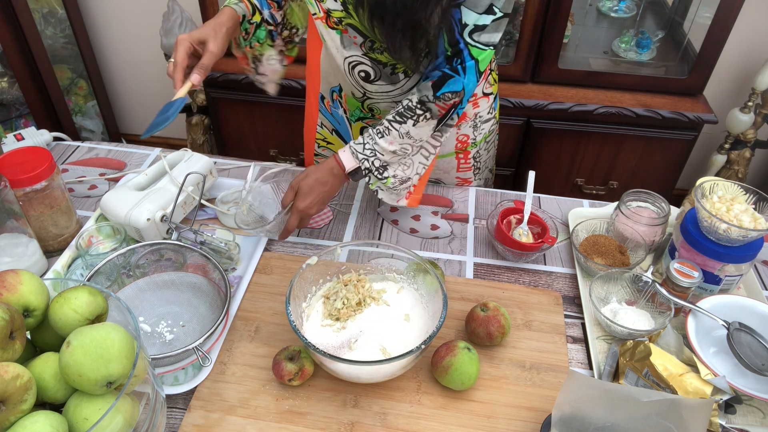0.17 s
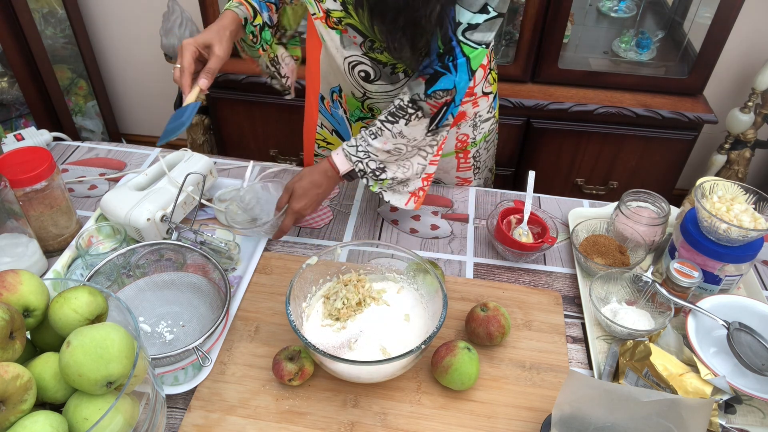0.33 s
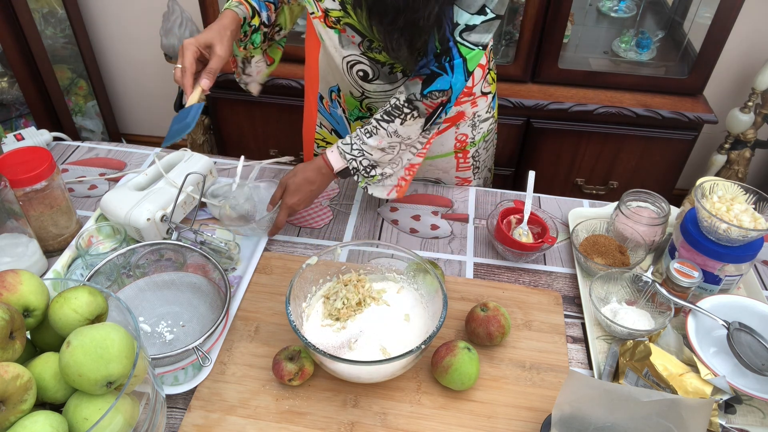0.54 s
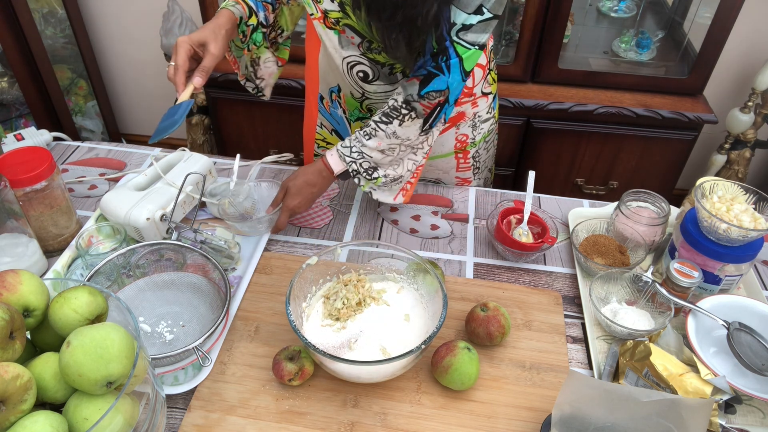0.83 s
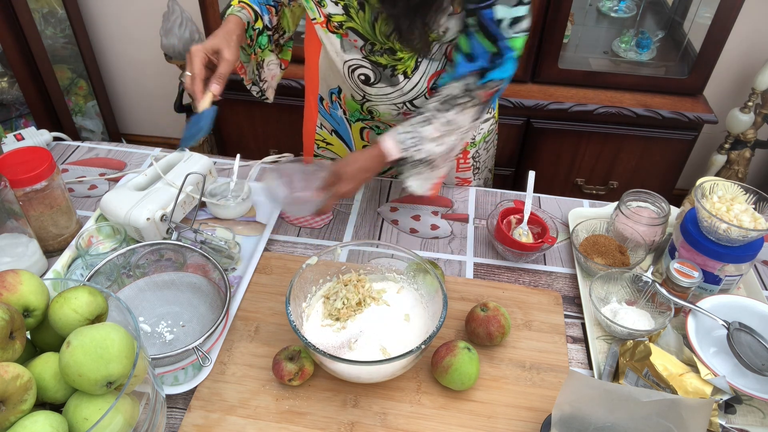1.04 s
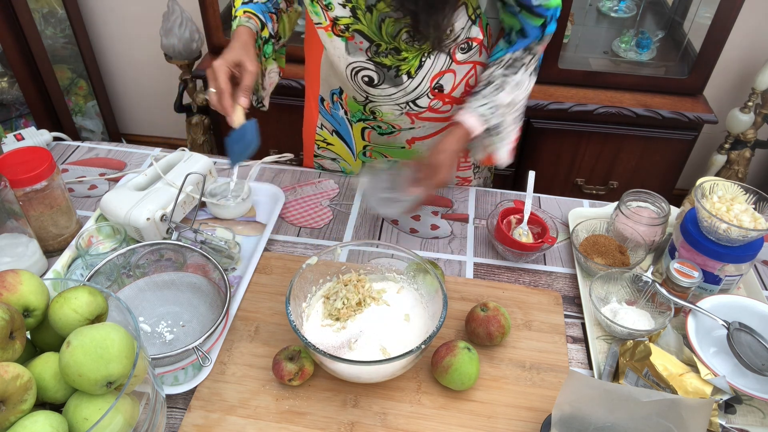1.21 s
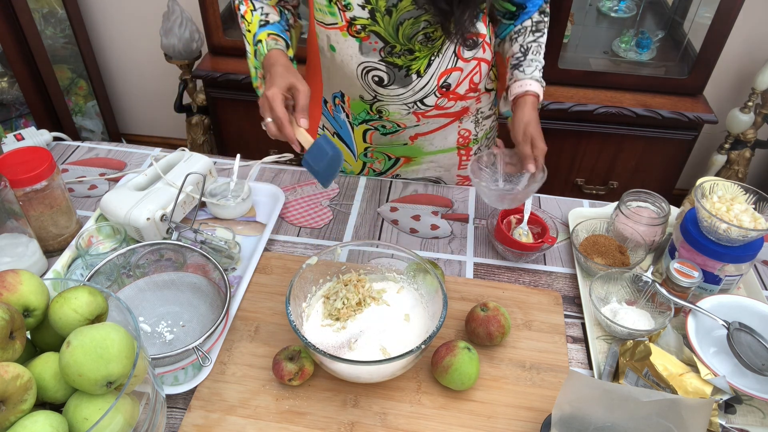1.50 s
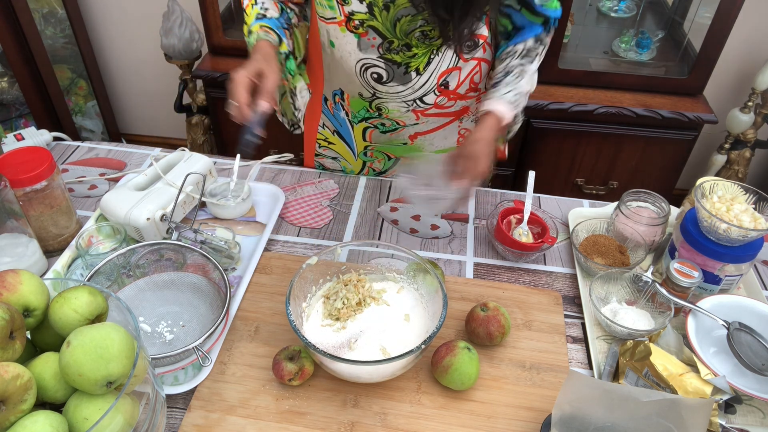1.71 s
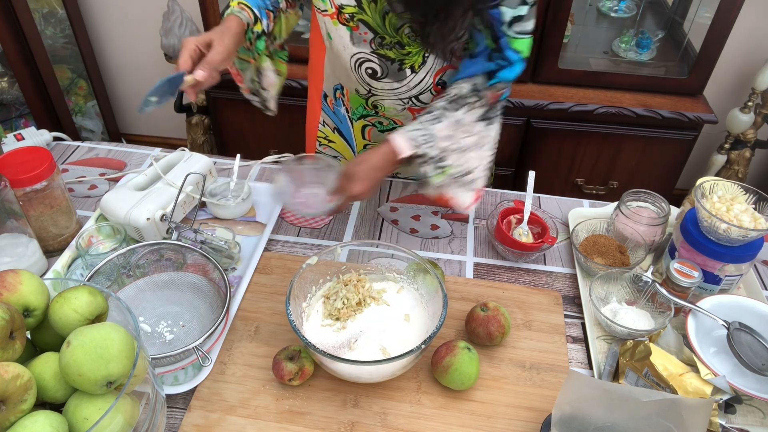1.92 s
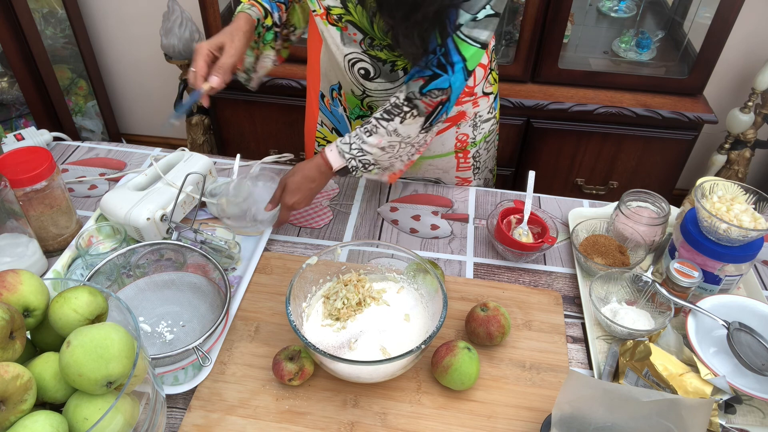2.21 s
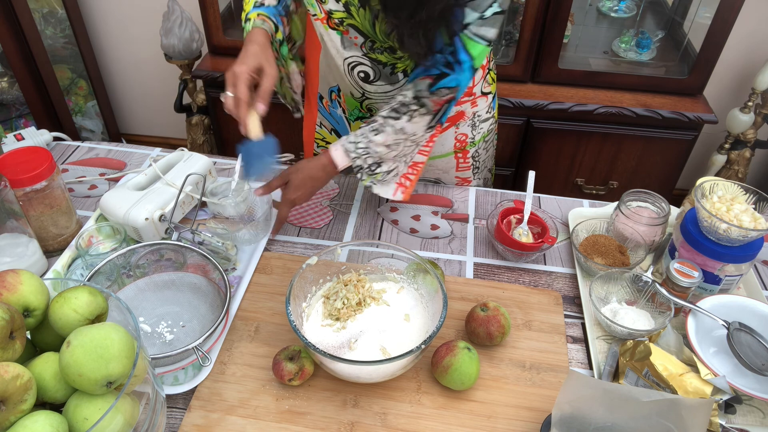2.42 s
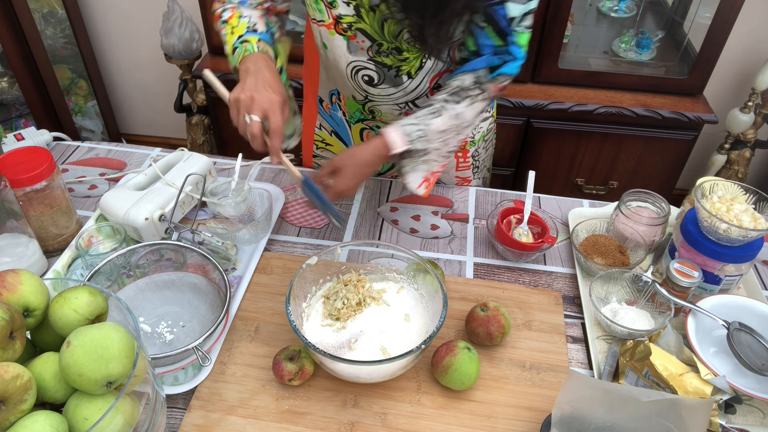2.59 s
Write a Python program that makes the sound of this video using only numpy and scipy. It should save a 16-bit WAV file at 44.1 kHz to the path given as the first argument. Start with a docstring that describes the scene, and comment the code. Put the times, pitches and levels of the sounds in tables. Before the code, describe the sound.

Glass bowl clatters onto a loaded tray, rocks and settles, then knocks down again with brighter clinks

```python
"""A small glass bowl is set down twice on a crowded plastic tray in a home kitchen: it knocks, rocks and rings.
The bowl, a jar and a cup beside it are sums of decaying sine modes, started anew by each blow.
The knocks are noise bursts through the tray's resonances plus a low thud; the chatter is dense random ticks.
All these get a noise-made room tail; underneath lies a soft low air noise with two wavering hums."""
import sys
import numpy as np
from scipy import signal
from scipy.fft import rfft, irfft, next_fast_len
from scipy.io import wavfile
from scipy.ndimage import uniform_filter1d

SR = 44100
rng = np.random.default_rng(int(sys.argv[2]) if len(sys.argv) > 2 else 0)


def to_wav(s):
    """Save 16-bit WAV."""
    ch = np.atleast_2d(s).T  # columns
    pcm = np.round(np.clip(ch, -1, 1) * 32767)  # PCM
    wavfile.write(sys.argv[1], SR, pcm.astype(np.int16))


def level_to_linear(level):
    """Convert decibel levels to linear amplitude factors, elementwise."""
    exponent = np.asarray(level, float) / 20
    return 10 ** exponent


N = 121275  # length in samples

# Colour of a contact on the tray, before tilt and resonances. Each row: frequency in Hz, gain in dB.
CLACK_COLOUR = [(35, -51), (70, -10), (130, -1.5), (586, -0.5), (1160, 1.5), (2460, -1), (3600, -8.5),
                (6300, -11), (8000, -19.5), (11000, -24.5), (14700, -27.5), (16500, -44.5)]

KITCHEN_DB, RING_KITCHEN_DB = -6, -9  # room tail against the dry sound: for tray sounds, for ringing things


def unit(x):
    """Scales x to rms 1."""
    return x / np.sqrt(np.mean(x ** 2) + 1e-20)


def along(points, hz):
    """Reads (Hz, value) points on a logarithmic frequency axis."""
    f, v = np.transpose(points)
    return np.interp(np.log(hz + 1), np.log(f + 1), v)


def filtered(x, response):
    """Multiplies the spectrum of x by a complex response of frequency."""
    m = next_fast_len(len(x) + 8192)  # spare room for the filter to ring out
    spectrum = rfft(x, m) * response(np.fft.rfftfreq(m, 1 / SR))
    return irfft(spectrum, m)[:len(x)]


def causal(db):
    """Minimum-phase response with the given gains in dB, so that nothing sounds ahead of its contact."""
    cepstrum = irfft(db * np.log(10) / 20)
    half = len(cepstrum) // 2
    folded = np.r_[cepstrum[0], 2 * cepstrum[1:half], cepstrum[half], np.zeros(len(cepstrum) - half - 1)]
    return np.exp(rfft(folded))


def octaves(hz):
    """Distance in octaves from 2 kHz, the pivot of the tilts."""
    return np.log2(np.clip(hz, 50, None) / 2000)


def tray(f):
    """The loaded tray: damped resonances added to a plain path of gain 1."""
    # Each row: centre in Hz, width in Hz, level in dB before the common trim below.
    resonances = [(124, 10, -0.5), (207, 19.8, 7.5), (305, 120, 6.5), (417, 21, -4.5), (799, 50, 2),
                  (900, 104, 6.5), (1023, 35, -1.5), (1194, 52, -7.5), (1690, 80, -3), (2270, 80, -11.5),
                  (2650, 100, -2), (3010, 62, 7), (3446, 100, 8.5), (3800, 200, -3)]
    trim_db = -3.5
    body = sum(level_to_linear(db) * 1j * f * width / (centre ** 2 - f ** 2 + 1j * f * width)
               for centre, width, db in resonances)
    return 1 + level_to_linear(trim_db) * body


def ring(modes, t, share, rise_s, best_hz=1000, reach=99):
    """One blow on (Hz, dB, t60 s) modes: those near best_hz speak most, and share scales every t60."""
    scatter_db = 2  # random level spread from blow to blow
    hz, db, t60 = np.transpose(modes)[:, :, None]
    level_luck, phase_luck = rng.standard_normal((2, len(modes), 1))
    drive_db = -6 * (np.log2(hz / best_hz) / reach) ** 2
    decay = level_to_linear(db + drive_db + scatter_db * level_luck - 60 * t / (t60 * share))
    tones = decay * np.sin(2 * np.pi * hz * t + phase_luck)
    return np.sum(tones, axis=0) * (1 - np.exp(-t / rise_s))


def kitchen(x):
    """Convolves x with a fresh noise tail of unit energy in which each frequency dies at its own speed."""
    # Each row: frequency in Hz, decay by 60 dB in seconds.
    tail_t60 = [(100, 0.29), (500, 0.48), (2000, .5), (6000, 0.46), (14000, 0.35)]
    hz, t, z = signal.stft(rng.standard_normal(SR * 3 // 4), SR, nperseg=256)
    fade = level_to_linear(-60 * t / along(tail_t60, hz)[:, None])
    tail = signal.istft(z * fade, SR, nperseg=256)[1]
    delayed = np.pad(x, (150, 0))  # the tail comes 3.4 ms behind the dry sound
    return signal.fftconvolve(delayed, tail / np.linalg.norm(tail))


def add(out, s, x):
    """Mixes x into out from time s in seconds."""
    part = out[round(s * SR):][:len(x)]
    part += x[:len(part)]


def place(out, s, dry, wet_db):
    """Mixes in a sound and its room tail."""
    add(out, s, dry)
    add(out, s, level_to_linear(wet_db) * kitchen(dry))


def air():
    """Low room noise in soft patches of time and pitch; two narrow noise bands waver as hums."""
    # Spectrum shape of the air. Each row: frequency in Hz, relative density in dB per Hz.
    air_colour = [(15, -66), (25, -30.5), (63, -12.5), (87, -12), (163, -9), (192, -0.5), (288, -4),
                  (368, 0), (399, -19.5), (457, -5), (1030, -4.5), (2090, -24), (14400, -42.5),
                  (16500, -53)]
    # Each row: hum frequency in Hz, width in Hz, level in dB rms.
    hum_bands = [(98.3, 12, -75), (379, 21, -74.5)]
    air_db, patchy_db = -63, 0.7  # air level rms, rms depth of its patches
    z = signal.stft(rng.standard_normal(N + 512), nperseg=512)[2]
    field = uniform_filter1d(rng.standard_normal(z.shape), size=4, axis=0)  # smooth over frequency
    field = uniform_filter1d(field, size=12, axis=1)  # smooth over time
    patchy = signal.istft(z * level_to_linear(patchy_db * unit(field)), nperseg=512)[1][:N]
    out = level_to_linear(air_db) * unit(filtered(patchy, lambda f: level_to_linear(along(air_colour, f))))
    for hz, width, db in hum_bands:
        band = filtered(rng.standard_normal(N), lambda f: np.exp(-((f - hz) / width) ** 2))
        out += level_to_linear(db) * unit(band)
    return out


def jar():
    """The neighbouring jar is touched and its modes ring."""
    # Contacts. Each row: start in seconds, level in dB, to which the mode levels are added.
    clinks = [(.160, -51), (.184, -38.5), (.232, -43)]
    # Each row: frequency in Hz, relative level in dB, decay by 60 dB in seconds.
    jar_modes = [(1965, 2.5, 0.19), (2595, -25, 0.0584), (3110, -16.5, .06), (5222, -12.5, .03)]
    out, t = np.zeros(N), np.arange(SR // 2) / SR
    for s, db in clinks:
        place(out, s, level_to_linear(db) * ring(jar_modes, t, 1, 0.003), RING_KITCHEN_DB)
    return out


def cup():
    """The cup beside the bowl is struck too; every blow rings with the same damping."""
    # Each row: start in seconds, level in dB before the mode levels, Hz driven best, reach in octaves.
    cup_blows = [(2.271, -29.5, 7000, 0.63), (2.326, -36, 5500, 0.43), (2.363, -36.5, 14400, .3),
                 (2.393, -38, 14000, .3), (2.437, -35, 1550, .4)]
    # Mode frequencies in Hz.
    cup_hz = [1555, 5525, 5570, 13380, 14010, 14450]
    # One row per mode: relative level in dB, decay by 60 dB in seconds before the share below.
    cup_modes = [(-5, 0.29), (2, 0.11), (-4.5, 0.14), (-8, 0.098), (-3, .11), (-7, 0.081)]
    share, rise_s = 0.85, 0.00033
    modes = np.column_stack([cup_hz, cup_modes])
    out, t = np.zeros(N), np.arange(SR // 2) / SR
    for s, db, best_hz, reach in cup_blows:
        place(out, s, level_to_linear(db) * ring(modes, t, share, rise_s, best_hz, reach), RING_KITCHEN_DB)
    return out


def chatter():
    """Many tiny random contacts of the rocking bowl and its neighbours shake the tray as the bowl settles."""
    # Two stretches, one per setting-down, as level curves. Each row: time in seconds, level in dB rms.
    stretches = [
        [(.14, -91.5), (.16, -47), (.3, -53), (.34, -45.5), (.5, -55.5), (.6, -56), (.7, -59), (.85, -61.5),
         (.95, -89.5)],
        [(2.25, -114.5), (2.28, -26.5), (2.35, -51.5), (2.38, -33), (2.44, -44), (2.52, -71.5), (2.62, -93)],
    ]
    ticks_per_s, spread_db, tilt = 2500, 2, -0.97  # tilt in dB per octave
    t = np.arange(N) / SR
    happens = rng.random(N) < ticks_per_s / SR
    strength = rng.standard_normal(N) * level_to_linear(spread_db * rng.standard_normal(N))
    ticks = unit(happens * strength)
    level = sum(level_to_linear(np.interp(t, *np.transpose(rows), left=-150, right=-150)) for rows in stretches)

    def dull(f):
        return causal(along(CLACK_COLOUR, f) + tilt * octaves(f)) * tray(f)

    dry = filtered(level * ticks, dull) / filtered(ticks, dull).std()
    return dry + level_to_linear(KITCHEN_DB) * kitchen(dry)[:N]


def knocks():
    """Each knock: a sharp crack and a noisy clack through the tray, and a thud of the table top."""
    # Each row: start in seconds, level in dB, tilt in dB per octave, rise in seconds,
    # thud over the knock in dB, Hz where the contact is loudest; the radiation gains below come on top.
    contacts = [(.143, -21.5, 2.5, 0.0024, -0.5, 1430), (.187, -29, 5, .001, 0, 2420),
                (0.246, -52.5, 0.5, 0.0043, -7, 1200), (0.285, -36.5, 1, .008, -32, 1500),
                (.319, -15, 2, 0.0019, -2.5, 1120), (.331, -19.5, -1, 0.0035, -12, 1260),
                (.410, -29.5, -0.5, 0.0014, -14, 1100), (.474, -29.5, -1, 0.0023, -5.5, 1400),
                (.488, -31, -1, 0.0031, -23, 900), (0.633, -38.5, 1, 0.0077, -8, 1400),
                (.660, -30, -1.5, 0.0036, 4, 1196), (.755, -29.5, -0.5, 0.0013, -29, 3130),
                (0.791, -51.5, 7, 0.0026, -31, 12000), (0.823, -35, -1, 0.0054, -8.5, 2700),
                (1.091, -63.5, 3, 0.017, -22, 4440), (2.233, -59.5, 5, 0.0031, -23, 4000),
                (2.256, -12, 3.5, 0.0017, -8, 3660), (2.272, -17.5, 3.5, 0.00087, -16, 1400),
                (2.289, -27, 3, 0.0029, -21, 1100), (2.327, -19.5, 1, 0.00046, -7, 1110),
                (2.343, -19, 1, 0.00094, -19, 1150), (2.389, -20.5, 2.5, 0.014, -4, 2700),
                (2.428, -27, 3.5, 0.0023, -17, 1490), (2.436, -28.5, -1.5, 0.0017, -25.5, 1200)]
    # Table top modes. Each row: Hz, relative level in dB, decay by 60 dB in seconds before the share below.
    table_modes = [(50.2, -14, 0.18), (120.8, 0.5, 0.29), (189.5, 0, 0.13), (296, 4.5, 0.13)]
    clack_gain_db, thud_gain_db = 15, -19  # how well tray and table top radiate a knock
    clack_t60_s, crack_t60_s = 0.049, 0.012
    crack_db, soften_db_per_s = 1.5, 2516  # the crack weakens with a slower rise
    loudest_db, loudest_octaves = 5, 0.45  # height and width of the hump at the loudest pitch
    thud_share, thud_rise_s = 0.51, 0.0085
    out, t = np.zeros(N), np.arange(SR // 4) / SR
    for s, db, tilt, rise_s, thud_db, loud_hz in contacts:
        clack_fade = level_to_linear(-60 * t / clack_t60_s)
        crack_fade = level_to_linear(crack_db - soften_db_per_s * rise_s - 60 * np.abs(t - rise_s) / crack_t60_s)
        onset = 1 - np.exp(-t / max(rise_s, 1e-4))
        burst = (clack_fade + crack_fade) * onset * rng.standard_normal(len(t))

        def contact(f):
            hump = loudest_db * np.exp(-((octaves(f) - octaves(loud_hz)) / loudest_octaves) ** 2)
            return causal(along(CLACK_COLOUR, f) + tilt * octaves(f) + hump) * tray(f)

        clack = filtered(burst, contact)
        clack = level_to_linear(db + clack_gain_db) * clack / np.linalg.norm(clack)  # set by energy
        thud = level_to_linear(db + thud_db + thud_gain_db) * ring(table_modes, t, thud_share, thud_rise_s)
        place(out, s, clack + thud, KITCHEN_DB)
    return out


def bowl():
    """The glass bowl rings in its modes, more briefly the tighter it is held."""
    # Each row: start in seconds, level in dB before the mode levels, Hz the contact drives best,
    # reach in octaves, factor on the ringing time left by the hand.
    bowl_blows = [(.320, -38, 9300, 0.35, 0.57), (.328, -25.5, 2070, 0.63, 0.3),
                  (.410, -35.5, 2600, 0.34, 0.82), (.474, -38, 2870, 0.23, 1),
                  (.826, -52.5, 1940, 0.64, 1.8), (2.273, -19.5, 2320, 0.5, .7),
                  (2.276, -35.5, 10800, 1.2, 1.3), (2.292, -25.5, 1880, 0.42, 1.6),
                  (2.327, -31, 2420, 1.1, 1.49), (2.350, -38, 6800, 0.28, 1.1),
                  (2.364, -28.5, 12500, .4, 0.48), (2.393, -24.5, 4640, 0.98, 0.34),
                  (2.435, -36, 4470, 0.86, 0.58)]
    # Mode frequencies in Hz, mostly in close pairs that beat.
    bowl_hz = [1396, 1457, 2885, 2926, 4748, 4790, 7085, 7130, 9850, 9906, 13060]
    # One row per mode: relative level in dB, decay by 60 dB in seconds before the hand's factor.
    bowl_modes = [(-1, 0.19), (-4, 0.11), (0, 0.12), (-20.5, 0.12), (-6.5, .36), (-12, 0.4), (-9, 0.28),
                  (-8, 0.17), (-7.5, 0.22), (-10, 0.19), (-8.5, 0.1)]
    rise_s = 0.00033
    modes = np.column_stack([bowl_hz, bowl_modes])
    out, t = np.zeros(N), np.arange(SR // 2) / SR
    for s, db, best_hz, reach, share in bowl_blows:
        place(out, s, level_to_linear(db) * ring(modes, t, share, rise_s, best_hz, reach), RING_KITCHEN_DB)
    return out


def scene():
    """Sums all sources into one channel."""
    return (air() + jar() + cup() + chatter() + knocks() + bowl())[None]


def roll_off(x):
    """The treble ends steeply here."""
    return signal.sosfilt(signal.butter(12, 16800, fs=SR, output="sos"), x)


def record(dry):
    """Hands on the finished mix."""
    return roll_off(dry)


dry = scene()
out = record(dry)
to_wav(out)
```